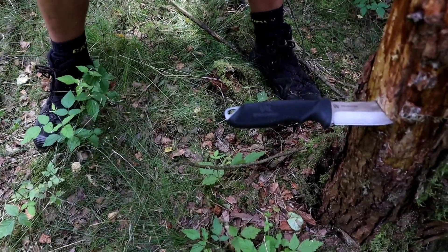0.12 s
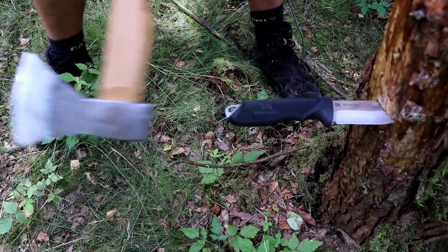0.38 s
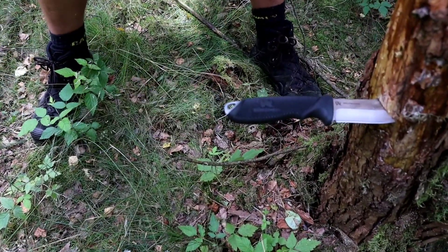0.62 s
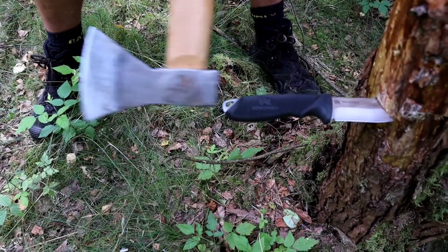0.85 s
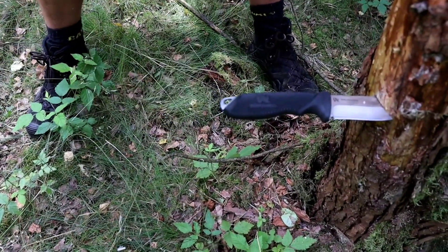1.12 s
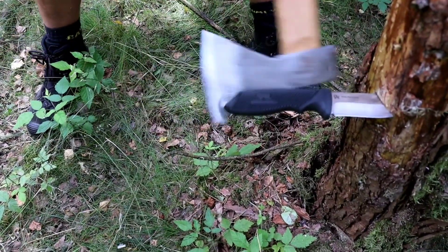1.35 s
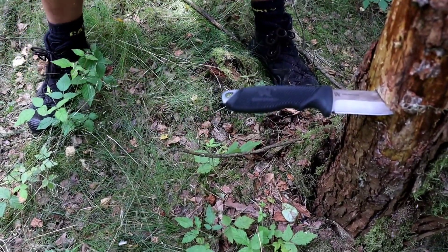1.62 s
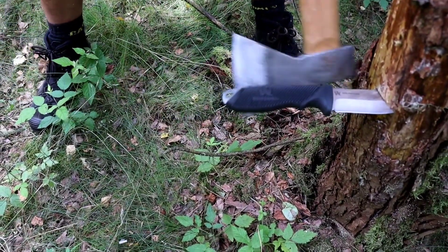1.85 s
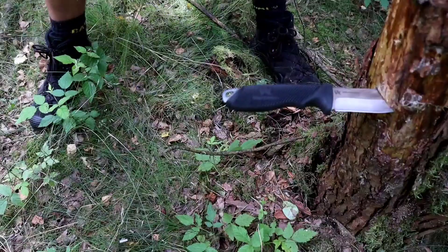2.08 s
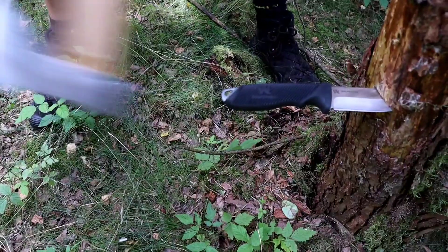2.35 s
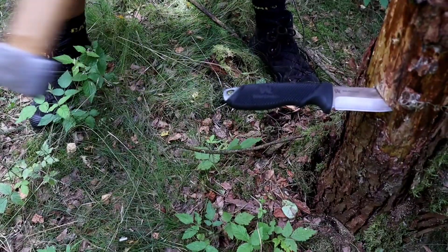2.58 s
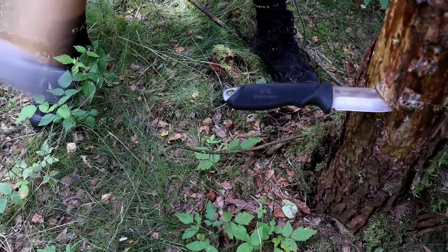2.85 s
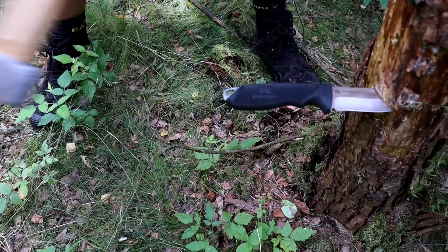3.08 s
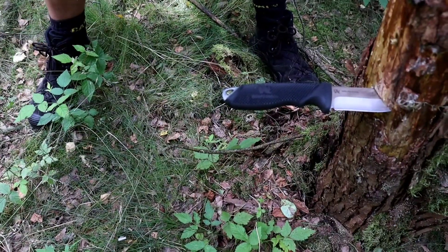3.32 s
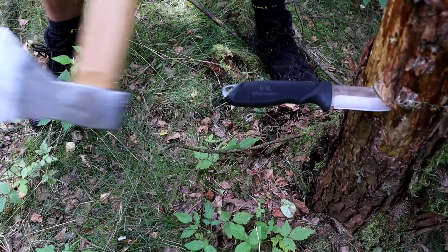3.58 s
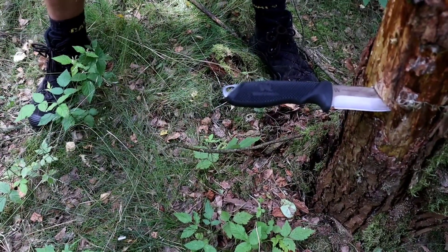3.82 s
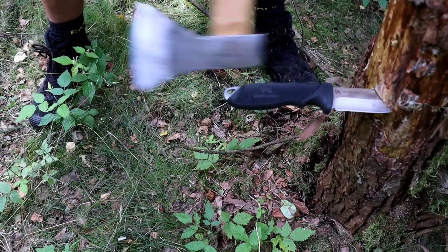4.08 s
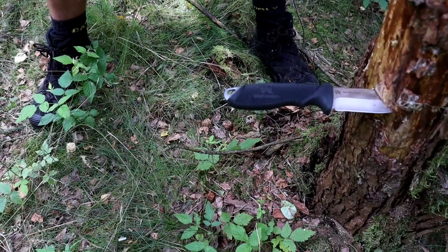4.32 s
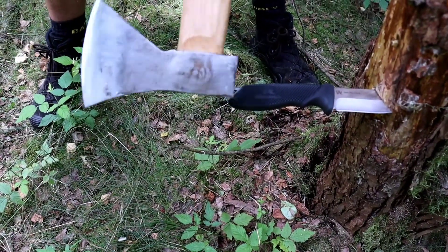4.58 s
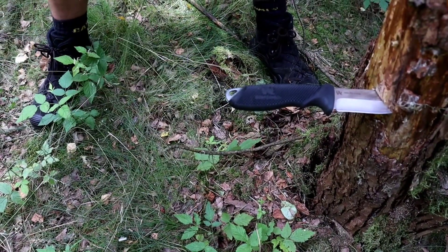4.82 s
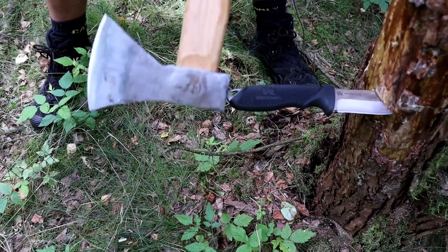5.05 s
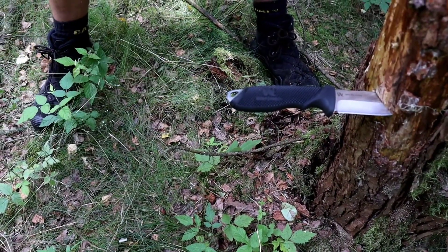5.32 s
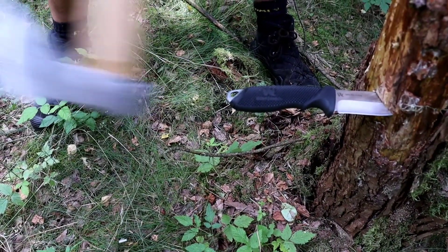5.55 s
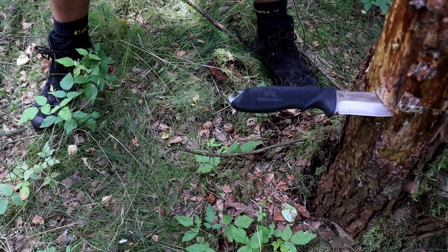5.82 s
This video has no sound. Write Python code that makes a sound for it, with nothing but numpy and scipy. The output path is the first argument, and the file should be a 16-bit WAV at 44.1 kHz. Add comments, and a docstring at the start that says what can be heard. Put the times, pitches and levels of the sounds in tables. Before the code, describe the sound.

The ring and tree echo of an earlier blow are fading at the start. Then an axe head hits the knife at about 0.36, 0.88, 1.39, 1.93, 2.5, 3.04, 3.56, 4.08, 4.63, 5.18 and 5.7 seconds. Each is a loud, close, splintery steel crack with a short dry trunk thud, slightly clipped; gain drops, then recovers, so high wavering steel rings and diffuse woodland echo bloom behind it. The blow at 1.39 is much lighter, a glancing clatter of handle knocks, bark scrape and low stem shudder, followed by tiny creaks around 1.6-1.7. The blows at 1.93 and 4.08 are also duller and lighter, with handle knocks; a faint knock follows 3.56. The last three sound lower and woodier, with brief grip rattles after them. Light scuffs precede several blows. Between them are crisp twig ticks, faint leaf hiss and distant rumble.

```python
"""A wood: a steel axe head drives a knife into a dead trunk, about two blows a second, close to the microphone.
Each blow is splintery noise plus dying sines for trunk, grip, blade and axe head; scattered noise is the trees' echo.
Gain control ducks at the blows and recovers, so the steel rings and the echo swell up after the crack.
Glancing blows let the wooden handle knock, with a shuddering stem; filtered noise makes ticks, scuffs and air.
"""
import sys
import numpy as np
from scipy import signal
from scipy.fft import rfft, irfft
from scipy.io import wavfile
from scipy.ndimage import uniform_filter1d

SR = 44100
rng = np.random.default_rng(int(sys.argv[2]) if len(sys.argv) > 2 else 0)


def ratio_of_db(decibels):
    """Turn decibels (scalar or array-like) into linear amplitude factors; 0 dB maps to 1."""
    return 10 ** (np.asarray(decibels, float) / 20)


def persist_wave(psi):
    """Save psi, clipped to +-1, as 16-bit WAV."""
    counts = np.round(np.clip(psi, -1, 1) * 32767).astype(np.int16)
    wavfile.write(sys.argv[1], SR, np.atleast_2d(counts).T)


N = 261380
LEAD = 10000  # samples ahead of the start, to hold a blow whose ring is already under way

# colour of leaves, far-off rumble and microphone hiss: pitch_hz, relative_level_db
AIR_COLOUR = [(18, -13.5), (30, 8), (81, -9), (158, -13), (247, -18.5), (511, -13), (1340, -13),
              (2130, -17), (2490, -18.5), (4090, -28), (7430, -27), (10700, -36), (15000, -35.5)]
AIR_DB = -56  # rms level

# scattering sent back by the trees: pitch_hz, relative_level_db, t60_s
TREE_SCATTER = [(50, -2.5, 1), (103.1, 12, 0.6), (324, -4.5, 0.29), (700, -14, 0.88), (1100, -12, 0.49),
                (1400, -15, 0.99), (1900, -13.5, 0.76), (2600, -15, 1.), (3470, -18, 0.96), (3850, -22, .9),
                (6470, -20, 0.67), (8600, -27, 0.36), (11000, -32.5, 0.4), (15000, -41.5, 0.35)]
TREES_DB, TREES_BUILD_S = -29.5, 0.01
# single large trunks: delay_s, level_db
TRUNK_ECHOES = [(0.068, -43.5), (.082, -48), (.105, -43)]
UNDERGROWTH_DB, UNDERGROWTH_T60 = -39, 0.088  # ground and bushes close by; t60 in s
GROUND_S, GROUND_DB, GROUND_HZ = .00052, -11, 1740  # delay, level and low-pass of the soft ground's copy

# clearest ticks of twigs and bark: start_s, level_db, centre_hz
CLEAR_TICKS = [(0.2214, -42.5, 9000), (0.2608, -47, 4500), (1.2166, -47, 6560), (1.235, -33, 4530),
               (1.5337, -43, 4770), (1.6694, -43, 11000), (1.6747, -40, 4630), (1.756, -41, 6360),
               (1.7818, -37.5, 11300), (1.8075, -42, 8970), (2.3092, -37.5, 12330), (2.3356, -39.5, 7920),
               (2.383, -41.5, 7570), (3.8899, -40.5, 6130), (3.9554, -31.5, 7250), (4.4714, -44.5, 13500),
               (4.497, -43, 7900), (4.555, -39.5, 13100), (5.1251, -35, 5060)]
TICK_T60 = 0.012  # s
FAINT_TICKS, FAINT_DB, FAINT_SPREAD_DB = 14, -62, 8  # count, lowest level, range above it
FAINT_LOW_HZ, FAINT_OCTAVES = 4500, 1.2  # lowest centre, range above it
# small dry resonances of creaking wood: pitch_hz, relative_level_db, t60_s
CREAK_MODES = [(3230, 0.5, 0.013), (4800, 17, 0.0035), (5340, -8, 0.0043)]
SLIPS, SLIP_START_S, SLIP_GAP_S = 5, 1.5595, .0397
SLIP_DB, SLIP_GROWTH_DB = -55.5, 0.5  # first slip, rise from slip to slip
# bark scraped by the passing head: start_s, length_s, level_db, centre_hz
BARK_SCRAPES = [(1.4219, .011, -11, 5000), (4.119, 0.05, -33, 4500), (5.656, .021, -53.5, 6020)]
# light touches just before a blow: start_s, level_db, centre_hz, t60_s
LIGHT_TOUCHES = [(.335, -24, 1050, .02), (.349, -27, 1510, 0.021), (.859, -22, 1900, 0.017),
                 (1.352, -40, 1100, .04), (1.358, -33, 1110, .05), (1.924, -27, 1400, 0.015),
                 (2.465, -27.5, 1900, .028), (2.470, -27, 700, 0.02), (5.147, -31.5, 1250, .028),
                 (5.158, -25, 1600, 0.014), (5.658, -33, 1460, 0.032), (5.665, -29.5, 1900, .015),
                 (5.677, -29, 980, 0.0091)]
# loose grip after a blow: start_s, first_tap_level_db, tap_count, gap_s, level_step_db
GRIP_RATTLES = [(.378, -2.5, 1, .012, 0), (3.068, 0, 2, .016, -1.5), (4.673, -13.5, 2, .0065, -2),
                (5.192, -5.5, 4, .0107, -4), (5.718, -1.5, 3, .013, -6)]
RATTLE_HZ, RATTLE_T60 = 696, 0.018  # t60 in s

# pitches of the long rings
BLADE_HZ, POMMEL_HZ, CHEEK_HZ, BIT_HZ, EDGE_HZ, HANDLE_HZ = 2654, 13180, 4893, 8371, 12740, 359
# colour of the crack of steel on steel: pitch_hz, relative_level_db
CRACK_COLOUR = [(300, -68.5), (1000, 1), (3000, -2.5), (6000, -11), (9000, -18.5), (13000, -24),
                (16000, -36)]
CRACK_DB, CRACK_T60 = -5, 0.021  # level against the blow's strength, t60 in s
# side of the axe head: pitch_hz, relative_level_db, t60_s
CHEEK_MODES = [(CHEEK_HZ, -38, 0.3)]
# cutting end and thin edge of the axe head: pitch_hz, relative_level_db, t60_s
BIT_MODES = [(BIT_HZ, -48.5, 0.45), (EDGE_HZ, -49, .33)]
# each face sweeps past the microphone on the rebound: s after the blow, s until 6 dB down
CHEEK_SWEEP, BIT_SWEEP = (0.017, 0.16), (0.13, 0.11)

# handle knocks after a glancing blow, the pitch higher when it lands near the head:
# start_s, strength_db, crack_relative_db, long_ring_relative_db, thud_pitch_factor
HANDLE_KNOCKS = [(1.3898, -6, -6.5, -9, 2.3), (1.3963, -9, -6, -16, 2.36), (1.4217, -2.5, -4.5, -8, 1.11),
                 (1.9758, -13.5, 2, -3.5, 0.99), (3.602, -33, -4, 6.5, 1.7), (4.1221, -19, -2, -8, 1.22),
                 (4.136, -25.5, -3.5, -9, 1.93)]
# thud of the wooden handle before the pitch factor: pitch_hz, relative_level_db, t60_s
THUD_MODES = [(151, 5, 0.019), (208, -5.5, 0.07), (260.2, -10.5, 0.067), (460, -9.5, 0.054),
              (840, -5, 0.029)]
# long hum of the handle: pitch_hz, relative_level_db, t60_s
HUM_MODES = [(HANDLE_HZ, -18.5, .46)]
KNOCK_TILT_DB = 3.5  # brightness of a knock's crack, dB per octave
# the stem's sway grows more slowly than the knock: base level, dB per knock dB, dB per unit of thud pitch
SHUDDER_DB, SHUDDER_SHARE, SHUDDER_DB_PER_PITCH = -36.5, 0.21, -9.5

# blows, the first just before the start; the cheek rings strongly when the head lands askew:
# start_s, strength_db, favoured_pitch_hz, knife_ring_relative_db, cheek_ring_relative_db
AXE_BLOWS = [(-.16, 20, 1600, -10, -5), (0.3626, 19.5, 1600, 4.5, -23), (0.8844, 20.5, 1550, 9.5, -0.5),
             (1.3875, 3, 2600, -4.5, 3), (1.9322, 11.5, 1222, -15.5, 4), (2.5031, 19.5, 2440, 0, -15),
             (3.0350, 20, 648, -5, -14), (3.5550, 16, 1227, -10, -3), (4.0779, 10.5, 1250, -7.5, 2.5),
             (4.6310, 18, 481.5, 7, -7), (5.1751, 18, 430, 7, -5.5), (5.7024, 19, 560, -2.5, -7.5)]
# short resonances of knife grip and trunk: pitch_hz, relative_level_db, t60_s
TRUNK_MODES = [(37.6, -8.5, .04), (70, -9.5, 0.018), (113, -6, 0.065), (196, -25, .05), (279, -5, 0.02),
               (386, -3, 0.017), (470, 0.5, 0.025), (560, -1.5, 0.031), (700, 10, 0.016),
               (1250, -3.5, 0.021), (1600, -4, 0.017), (2030, -7.5, 0.026), (2440, -9.5, 0.025),
               (3190, -7.5, 0.0061), (4170, -14, 0.015), (4230, -10.5, 0.004), (4500, -10.5, 0.028),
               (6353, -4, 0.012)]
# blade, then a close pair at the pommel that beats: pitch_hz, relative_level_db, t60_s
KNIFE_MODES = [(BLADE_HZ, -15.5, 0.034), (POMMEL_HZ, -36, 0.12), (POMMEL_HZ - 70, -41, 0.06)]
SPOT_DB, SPOT_OCTAVES = 9, .3  # boost around the favoured pitch, and its width
# brightness in dB per octave of a blow at full strength; lighter blows are duller
FULL_DB, TILT_DB, TILT_DB_PER_DB = 19, 0.83, -0.1034
# the more the cheek rings, the less the bit does, while the thin edge rings along
BIT_DB, BIT_DB_PER_CHEEK_DB, EDGE_DB_PER_CHEEK_DB = -3.5, -0.25, 0.5


def read(hz, at_hz, value):
    """Reads a curve between its points on a log pitch scale."""
    return np.interp(np.log(hz + 1), np.log(np.add(at_hz, 1)), value)


def slope(hz, tilt_db):
    """Tilts the colour by so many dB per octave around 1500 Hz, levelling out in the deep bass."""
    return tilt_db * np.log2(hz / 1500 + 0.019)


def add(mix, s, sound):
    """Lays a sound into the mix at its start in seconds, cutting what runs past the end."""
    part = mix[round(s * SR) + LEAD:][:len(sound)]
    part += sound[:len(part)]


def ring(modes, colour_db=lambda hz: 0, rise_s=0.0001, rise_turns=0, size=SR):
    """Dying sines, set going over the short time of contact; low ones of a large body build up later."""
    hz, db, t60 = np.transpose(modes)[:, :, None]
    t = np.arange(size) / SR
    rise = np.minimum(t / (rise_s + rise_turns / hz), 1)
    fall = ratio_of_db(db + colour_db(hz) - 60 * t / t60)
    return -(rise * fall * np.sin(2 * np.pi * hz * t)).sum(0)


def burst(colour_db, t60, rise_s):
    """Coloured noise with a quick rise and a fall."""
    t = np.arange(2048) / SR
    spectrum = rfft(rng.standard_normal(2048))
    noise = irfft(spectrum * ratio_of_db(colour_db(np.fft.rfftfreq(2048, 1 / SR))))
    return noise / noise.std() * ratio_of_db(-60 * t / t60) * np.minimum(t / rise_s, 1)


def small(events, t60, octaves, rise_s):
    """Short bursts of noise, each around its own centre, 6 dB down at the given octaves away."""
    out = np.zeros(N + LEAD)
    for s, db, centre_hz in events:
        colour_db = lambda hz: -6 * abs(np.log2(hz / centre_hz + .01) / octaves)
        add(out, s, ratio_of_db(db) * burst(colour_db, t60, rise_s))
    return out


def air():
    """Leaves, far-off rumble and the microphone's own hiss: coloured noise swelling in patches."""
    hz = np.fft.rfftfreq(2048, 1 / SR)
    real, imaginary, patches = rng.standard_normal((3, N // 512 + 5, len(hz)))
    patches = uniform_filter1d(uniform_filter1d(patches, 8, 0), 20, 1)  # smooth in time, then in pitch
    patch_db = 1.2 * patches / patches.std()
    spectrum = (real + 1j * imaginary) * ratio_of_db(read(hz, *np.transpose(AIR_COLOUR)) + patch_db)
    hiss = signal.istft(spectrum.T, nperseg=2048, noverlap=1536)[1][:N]
    return ratio_of_db(AIR_DB) * hiss / hiss.std()


def trees(shock):
    """Dense scattering between the trees: noise that builds up and dies by band."""
    at_hz, db, t60 = np.transpose(TREE_SCATTER)
    hz, frame_s, spectrum = signal.stft(rng.standard_normal(SR), SR, nperseg=1024, noverlap=768)
    fall_db = 60 * frame_s / read(hz, at_hz, t60)[:, None]
    spectrum = spectrum * ratio_of_db(read(hz, at_hz, db)[:, None] - fall_db)
    tail = signal.istft(spectrum, SR, nperseg=1024, noverlap=768)[1][:SR]
    t = np.arange(SR) / SR
    tail = tail * (1 - np.exp(-(t / TREES_BUILD_S) ** 2))
    return ratio_of_db(TREES_DB) * signal.fftconvolve(shock, tail)[:len(shock)]


def echoes(struck):
    """A short dull scatter close by and single echoes from large trunks, which return only the middle range."""
    t = np.arange(SR // 6) / SR
    scatter = ratio_of_db(UNDERGROWTH_DB - 60 * t / UNDERGROWTH_T60) * rng.standard_normal(len(t)) * (t > .004)
    scatter = signal.lfilter(*signal.butter(1, 2000, fs=SR), scatter)
    single = np.zeros(len(t))
    for s, echo_db in TRUNK_ECHOES:
        single[round(s * SR)] = ratio_of_db(echo_db)
    single = signal.lfilter(*signal.butter(2, [1700, 3000], "band", fs=SR), single)
    return signal.fftconvolve(struck, scatter + single)[:len(struck)]


def ground(struck):
    """Direct sound plus its dull reflection off the soft ground, which hollows out the middle."""
    dull = signal.lfilter(*signal.butter(1, GROUND_HZ, fs=SR), struck)
    return struck + ratio_of_db(GROUND_DB) * np.roll(dull, round(GROUND_S * SR))


def ticks():
    """Twigs and bark: the clear ticks, and fainter ones scattered at random, as short noise bursts."""
    when, size, colour = rng.random((FAINT_TICKS, 3)).T
    level_db = FAINT_DB + FAINT_SPREAD_DB * size
    centre_hz = FAINT_LOW_HZ * 2 ** (FAINT_OCTAVES * colour)
    faint = zip(when * N / SR, level_db, centre_hz)
    return small([*CLEAR_TICKS, *faint], TICK_T60, octaves=0.78, rise_s=.0006)


def creaks():
    """The wood slips at an even pace, harder each time: handfuls of clicks into small dry resonances."""
    clicks = np.zeros(N + LEAD)
    for k in range(SLIPS):
        handful = rng.standard_normal(330) * (rng.random(330) < .03)  # sparse clicks
        add(clicks, SLIP_START_S + k * SLIP_GAP_S, ratio_of_db(SLIP_DB + k * SLIP_GROWTH_DB) * handful)
    return signal.oaconvolve(clicks, ring(CREAK_MODES, rise_s=0.00077)[:1500])[:N + LEAD]


def scrapes():
    """Scraped bark: grainy hiss under a short stroke that dies away."""
    out = np.zeros(N + LEAD)
    for s, length_s, db, centre_hz in BARK_SCRAPES:
        grain_db = 3. * np.minimum(rng.exponential(1, 4410 // 45), 3)
        grains = rng.standard_normal(4410) * ratio_of_db(grain_db.repeat(45))  # a new grain about every ms
        band_hz = [centre_hz * 0.18, min(centre_hz * 2, SR * .45)]
        hiss = signal.lfilter(*signal.butter(1, band_hz, "band", fs=SR), grains)
        hiss = hiss[:round(length_s * SR)]
        stroke = np.linspace(1, 0, len(hiss)) ** 1.1
        add(out, s, ratio_of_db(db) * hiss / hiss.std() * stroke)
    return out


def grazes():
    """Light touches before a blow, each a short dull scuff of noise."""
    return sum(small([touch[:3]], touch[3], octaves=0.42, rise_s=0.0023) for touch in LIGHT_TOUCHES)


def rattles():
    """The loose grip rattles: short runs of evenly spaced dull taps."""
    taps = []
    for s, db, count, gap_s, step_db in GRIP_RATTLES:
        taps += [(s + k * gap_s, db + k * step_db, RATTLE_HZ) for k in range(round(count))]
    return small(taps, RATTLE_T60, octaves=.6, rise_s=0.0005)


def crack(tilt_db=0):
    """The splintery noise of steel meeting steel."""
    colour_db = lambda hz: read(hz, *np.transpose(CRACK_COLOUR)) + slope(hz, tilt_db)
    return burst(colour_db, CRACK_T60, 0.00057)


def sweep(facing_s, half_s):
    """Loudest when the ringing face points at the microphone; the head wobbles as it flies."""
    t = np.arange(SR) / SR
    wobble = sum(np.sin(2 * np.pi * (hz * t + rng.random())) for hz in (11, 19, 31))
    return ratio_of_db(-6 * ((t - facing_s) / half_s) ** 2 + 2.2 * wobble)


def shudder(low_hz, high_hz, t60):
    """The stem sways in the ground: a dying band of low noise."""
    band = signal.butter(2, [low_hz, high_hz], "band", fs=SR)
    sway = signal.lfilter(*band, rng.standard_normal(SR))
    return ratio_of_db(-60 * np.arange(SR) / SR / t60) * sway / sway.std()


def knocks():
    """The wooden handle thuds low and hums on, the head rings again; the stem shudders in the ground."""
    out = np.zeros(N + LEAD)
    for s, db, crack_db, ring_db, pitch in HANDLE_KNOCKS:
        thud = ring(THUD_MODES * np.array([pitch, 1, 1]), rise_s=0.0009)
        hum = ratio_of_db(ring_db) * ring(HUM_MODES, rise_s=0.018)
        add(out, s, -ratio_of_db(db) * (thud + hum))
        add(out, s, ratio_of_db(db + crack_db) * crack(KNOCK_TILT_DB))
        add(out, s, ratio_of_db(db + crack_db - 3) * ring(BIT_MODES) * sweep(*CHEEK_SWEEP))
        shudder_db = SHUDDER_DB + SHUDDER_SHARE * db + SHUDDER_DB_PER_PITCH * (pitch - 1)
        for low_hz, high_hz, t60 in [(42.4, 90, 0.99), (90.5, 170, 0.6)]:  # the lowest sway lasts longest
            add(out, s, ratio_of_db(shudder_db) * shudder(low_hz, high_hz, t60))
    return out


def blows():
    """Crack, trunk and grip, then the longer rings of knife and axe head; also the bare shock sent to the trees."""
    out, shock = np.zeros((2, N + LEAD))
    for s, db, spot_hz, knife_db, cheek_db in AXE_BLOWS:
        tilt_db = TILT_DB + TILT_DB_PER_DB * (FULL_DB - db)
        spot = lambda hz: np.exp(-(np.log2(hz / spot_hz + 0.0084) / SPOT_OCTAVES) ** 2)
        body_db = lambda hz: slope(hz, tilt_db) + SPOT_DB * spot(hz)
        # the thin edge is the mode above 10 kHz
        bit_db = lambda hz: BIT_DB + cheek_db * np.where(hz > 10000, EDGE_DB_PER_CHEEK_DB, BIT_DB_PER_CHEEK_DB)
        body = ring(TRUNK_MODES, body_db, rise_turns=0.76, size=6000)
        knife = ratio_of_db(knife_db) * ring(KNIFE_MODES)
        cheek = ratio_of_db(cheek_db) * ring(CHEEK_MODES) * sweep(*CHEEK_SWEEP)
        bit = ring(BIT_MODES, bit_db) * sweep(*BIT_SWEEP)
        add(out, s, ratio_of_db(db - 10.5) * body)
        add(out, s, ratio_of_db(db) * (knife + cheek + bit))
        add(out, s, ratio_of_db(db + CRACK_DB) * crack(tilt_db))
        # over all directions together the colour of the blow is smooth
        hz = np.fft.rfftfreq(256, 1 / SR)
        pulse = irfft(ratio_of_db(db + slope(hz, tilt_db) + 1.0 * spot(hz)))
        add(shock, s, np.roll(pulse, 128))
    return out, shock


def scene():
    """Everything struck, with its echo, over the air."""
    blow, shock = blows()
    knock = knocks()
    struck = blow + knock + grazes() + rattles()
    near = ground(struck) + echoes(struck) + trees(shock + ratio_of_db(-45.0) * knock)
    near += ticks() + creaks() + scrapes()
    return (near[LEAD:] + air())[None]


def top_cut(x):
    """Nothing passes above the cut-off."""
    return signal.sosfilt(signal.butter(12, 15850, fs=SR, output="sos"), x)


def record(dry):
    """Gain control falls within milliseconds and climbs back at a steady rate; what it misses clips."""
    # the microphone drops the lowest bass
    dry = signal.lfilter(*signal.butter(2, 45, "high", fs=SR), dry)
    smooth = np.exp(-1 / (0.002 * SR))
    level_db = 10 * np.log10(signal.lfilter([1 - smooth], [1, -smooth], dry[0] ** 2) + 1e-12)
    # the held level sinks by 227 dB a second until a louder sound lifts it
    climb_db = np.arange(N) * 227.0 / SR
    held_db = np.maximum.accumulate(level_db + climb_db) - climb_db
    over_db = np.maximum(held_db + 10.0, 0)  # above a threshold of -10 dB
    lag = np.exp(-1 / (0.0017 * SR))
    ducked = dry * ratio_of_db(-.95 * signal.lfilter([1 - lag], [1, -lag], over_db))
    return top_cut(np.clip(ducked, -1, 1))


dry = scene()
out = record(dry)
persist_wave(out)
```